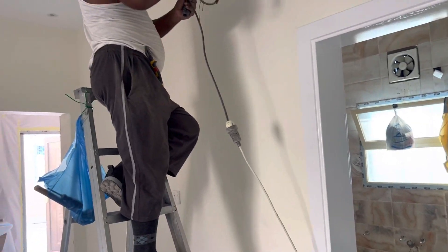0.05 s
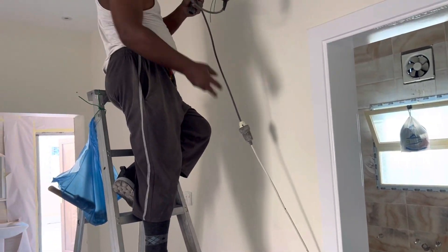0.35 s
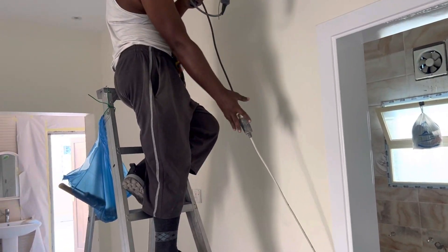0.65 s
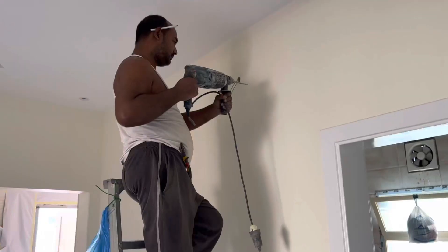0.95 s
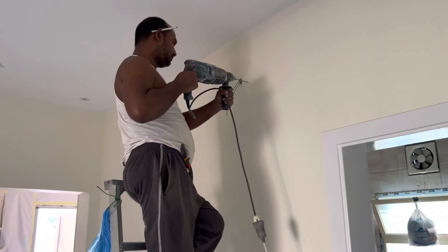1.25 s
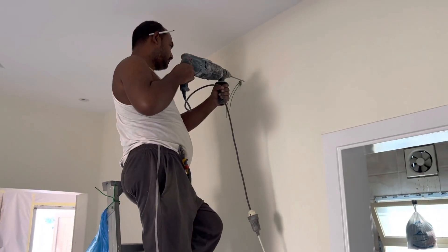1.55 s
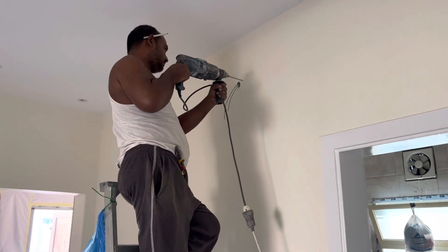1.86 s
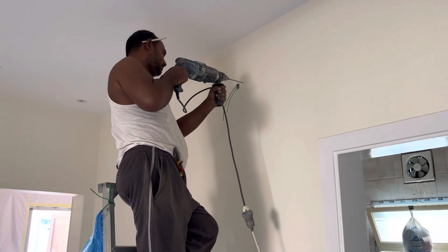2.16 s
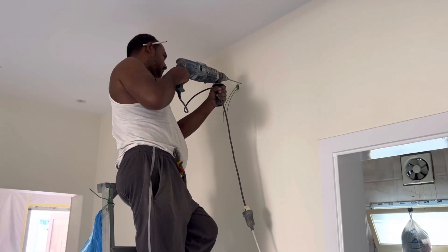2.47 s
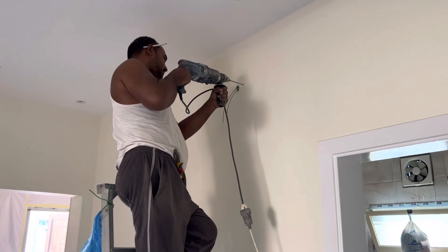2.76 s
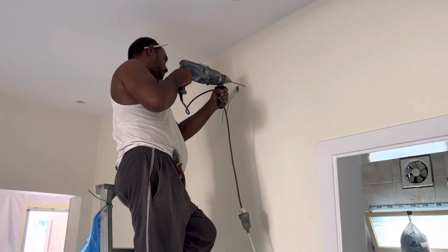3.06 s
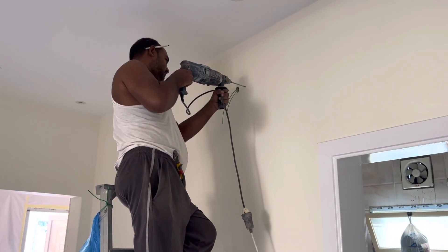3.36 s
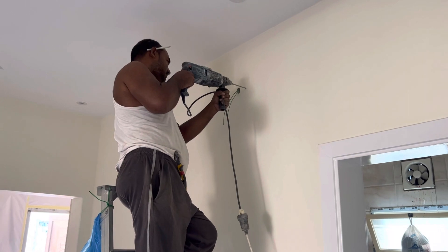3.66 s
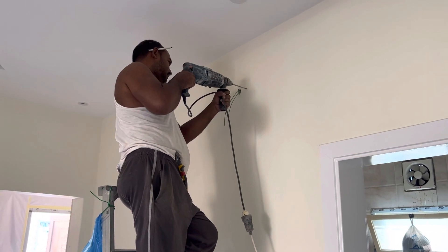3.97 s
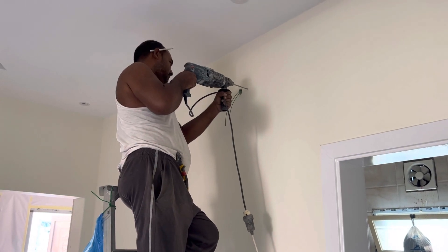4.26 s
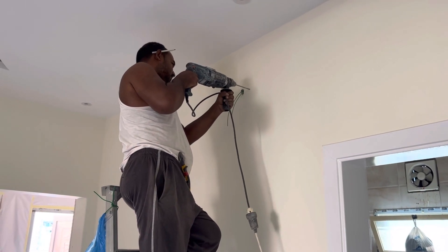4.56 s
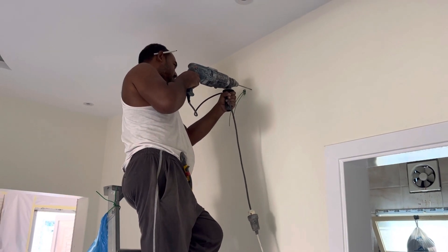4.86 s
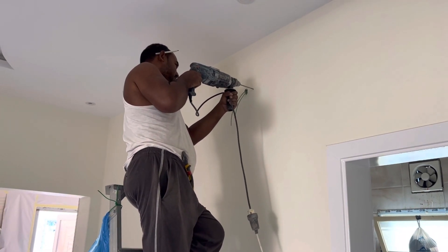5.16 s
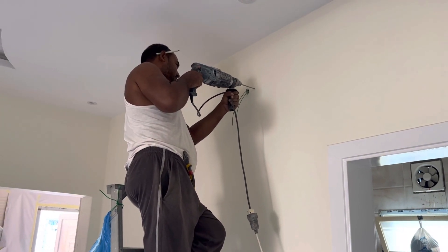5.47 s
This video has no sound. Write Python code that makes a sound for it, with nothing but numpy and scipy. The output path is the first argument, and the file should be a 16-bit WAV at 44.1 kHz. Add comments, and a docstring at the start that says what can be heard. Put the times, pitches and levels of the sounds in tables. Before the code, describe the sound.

A low electric hum and faint building rumble fill a bare, echoing room. A sharp plastic click comes at about 0.6 seconds, followed by soft hand scuffs. Near 1 second a corded hammer drill starts, close and in stereo, whining and grinding into masonry. A rapid flurry of blows ends in a brief, very high squeal at about 1.3 seconds. The drill swells again around 2 seconds, then winds down, its motor pitch falling under a thin whistle, and dies away by about 3.4 seconds with a light click. The hum remains, with trigger clicks between 4.2 and 4.7 seconds. The gears chatter drily, and from about 4.8 seconds the hammer starts slowly, then gets faster and louder. Each blow rings the steel bit and knocks the casing, while the chuck rattles, the bit scrapes and the wall booms until the end, at about 5.6 seconds.

```python
"""A corded rotary hammer drill bores into the wall of a bare, echoing room, on a close stereo pair.
First run: the bit grinds masonry in two swells, with a flurry of blows and a squeal, then whistles
as the motor winds down. Second run: after trigger clicks the hammer starts slowly and speeds up,
each blow ringing the steel bit, knocking the gear case and shaking the wall.
Electric hum and the rumble of the building fill the pauses."""
import sys
import numpy as np
from scipy import signal
from scipy.fft import rfft, irfft, next_fast_len
from scipy.io import wavfile
from scipy.ndimage import map_coordinates

SR = 44100
rng = np.random.default_rng(int(sys.argv[2]) if len(sys.argv) > 2 else 0)


def generate_wav(signal):
    """Clip the signal to [-1, 1] and save it as 16-bit WAV at the path in sys.argv[1]."""
    frames = np.transpose(np.atleast_2d(signal))
    scaled = np.clip(frames, -1, 1) * 32767
    pcm = np.round(scaled).astype(np.int16)
    wavfile.write(sys.argv[1], SR, pcm)


N = 243431

# Levels in the tables are relative; each source sets its own gain.
# rotor speed in the first run: t/s, f/Hz
ROTOR_SPEED = [(.96, 200.5), (1.15, 311), (1.28, 344.4), (1.45, 329.2), (1.7, 294.2), (1.85, 339.5),
               (1.95, 371.2), (2.05, 382.7), (2.18, 381.7), (2.5, 316.3), (3.3, 130.2)]
# trigger squeezes: pulled t/s, full power t/s, hold/s, level/dB, rise/(dB/s), fall/(dB/s)
TRIGGER_SQUEEZES = [(0.924, 0.974, .002, -30, 207, 23.5), (1.038, 1.176, 0.077, -23, 77, 13),
                    (1.763, 1.992, 0.098, -22.5, 25, 23)]
# pace of the striker in the first run: t/s, blow rate/Hz
STRIKER_PACE = [(1.073, 33.7), (1.12, 51.4), (1.2, 56.7), (1.235, 58)]
# single blows and jolts of the chuck: t/s, steel level/dB, knock level/dB, bite level/dB, chip t60/s
SINGLE_BLOWS = [(1.262, -5.5, -25, -15, .014), (1.279, -10, -30, -25, 0.018),
                (3.3112, -68, -49, -33.5, 0.015), (4.760, -56, -35, -26.5, .02),
                (4.835, -43, -26, -32, .02), (4.945, -32, -27, -34, 0.016), (5.0003, -32, -20, -36, .014),
                (5.047, -19.5, -22.5, -25, 0.017), (5.091, -17.5, -20.5, -33, .022),
                (5.1325, -20, -27, -20, 0.02), (5.1723, -18, -21.5, -22, .028),
                (5.2105, -14, -19, -20, .028), (5.2482, -12, -19, -15, .014), (5.283, -16.5, -25, -21, .04),
                (5.317, -17, -15.5, -16, 0.025), (5.356, -11.5, -18.5, -24, 0.02),
                (5.3938, -11.5, -20, -29, 0.013), (5.428, -26, -15.5, -30, .022),
                (5.4702, -11, -13.5, -34, 0.024), (5.5102, -16, -16, -18, .022)]
# kicks of the bit against the chuck: t/s, level/dB
BIT_REBOUNDS = [(4.868, -29.5), (4.966, -26), (5.035, -24), (5.080, -26), (5.326, -23), (5.493, -17)]
# struck modes: f/Hz, level/dB, t60/s
BIT_MODES = [(8300, -16.5, 0.052), (9700, 0.5, 0.05), (11100, -12.5, .025), (13330, 6, 0.05),
             (14700, -5, 0.039), (14770, -9, .05), (15290, -7, 0.025)]
CASE_MODES = [(167, -16, 0.042), (293, -11.5, 0.032), (1020, -8.5, 0.025), (1300, 5.5, 0.019),
              (1433, 3, 0.023), (1972, -2, 0.02), (2180, -8.5, .016), (2590, -6.5, 0.02)]  # chuck and gear case
# resonances of the housing: f/Hz, width/Hz, level/dB
HOUSING_MODES = [(1020, 39, -10.5), (1792, 90, -8.5), (4740, 41, -6.5)]
# resonances flaring up in the first run: t/s, half length/s, f/Hz, level/dB
RESONANCE_FLARES = [(1.215, 0.046, 1780, -33), (1.84, .05, 985, -43.5), (1.89, 0.088, 1397, -35),
                    (2.02, 0.045, 1266, -36), (2.112, .04, 1423, -36), (2.23, .06, 1016, -40),
                    (2.35, .4, 3032, -47), (2.68, 0.16, 871, -49.5), (2.953, .2, 1057, -59)]
# brief swells: t/s, half length/s, level/dB
SECOND_ORDER_SWELLS = [(1.352, 0.039, -33.5), (1.88, 0.044, -41.5), (2.0, 0.06, -34.5)]  # the rotor's second order sings out
HAND_SCUFFS = [(.782, .04, -48), (0.919, .016, -52)]
# growl of the crank: multiples of its speed, and level/dB for each
CRANK_HARMONICS = [2, 3, 4, 9, 12]
CRANK_LEVELS = [-38.5, -32, -29.5, -29, -22.5]
# clicks of plug, trigger and chuck: t/s, level/dB, treble re level/dB, echo/dB
PLASTIC_CLICKS = [(.549, -51.5, -32, 40), (.597, -23.5, -10.5, 34), (3.219, -49, -2, 36),
                  (3.311, -44.5, -30, 28), (4.182, -58, -10, 33.5), (4.472, -66, -29, 39),
                  (4.553, -36, -0.5, 41), (4.672, -43, -1, 41.5)]
# room tone: from t/s, hum f/Hz, hum level/dB, buzz level/dB, rumble level/dB, air level/dB
ROOM_TONE = [(0, 59.9, -49, -49.5, -43, -44), (.95, 64, -64, -60, -55, -47),
             (2.97, 64.3, -51.5, -59.5, -55, -49), (4.6, 60, -45.5, -51, -49, -47)]
# noise spectra: f/Hz, level/dB
GRIND_SPECTRUM = [(60, -40), (150, -16.5), (200, -19), (330, -3), (480, -4), (750, 0.5), (1050, 0.5),
                  (1400, 3.5), (2500, 1), (3300, -0.5), (4000, 0), (5500, -1.5), (7000, -5), (9000, -8),
                  (12000, -10.5), (15500, -19.5)]  # crushed masonry and cooling air
BITE_SPECTRUM = [(80, -23), (140, -10.5), (260, -3), (550, -1), (1000, -9), (1550, -2.5), (1790, 9),
                 (2050, 4.5), (2800, -2), (3500, 2.5), (4300, 0.5), (6000, -6), (9000, -14.5), (14000, -23)]  # the wall cracking under a blow
RATTLE_SPECTRUM = [(200, -21.5), (600, -16), (820, -7), (1000, 1), (1290, 2), (1440, -5), (1620, -20),
                   (1950, -7), (2550, -6), (2850, -17), (3050, -8), (3450, -16), (7000, -37)]  # the chuck
BOOM_SPECTRUM = [(35, -25), (60, -13.5), (85, 1), (112, -0.5), (170, 6.5), (300, 2), (380, -0.5), (500, 1),
                 (700, -12.5), (1200, -32)]  # the shaken wall
SCRAPE_SPECTRUM = [(500, -9.5), (2000, 13.5), (3500, 4), (5000, 5), (6800, 1), (8400, 3), (11500, -3),
                   (13500, -10), (15500, -7.5)]  # the bit in its hole
CHATTER_SPECTRUM = [(400, -12), (900, -1.5), (1380, -2), (1600, -5), (2200, -3), (2520, 1), (2850, -7),
                    (6000, -18)]  # slowly turning gears
SNAP_SPECTRUM = [(150, -16), (600, -8.5), (1200, 2), (1700, -4.5), (2600, -0.5), (4000, -1), (6300, -0.5),
                 (9000, -2.5), (15000, -24)]  # hard plastic
SCUFF_SPECTRUM = [(300, -9), (1100, 5.5), (2400, 1), (4000, -6), (9000, -23)]  # hands on the housing
RUMBLE_SPECTRUM = [(20, -45), (33, -21), (48, 3.5), (80, 3), (115, -0.5), (170, -3), (300, -9), (600, -15),
                   (1300, -19.5), (2500, -31), (5000, -47), (9000, -68), (15000, -74)]  # the building
# decay of the bare room: f/Hz, t60/s
ROOM_DECAY = [(150, 0.31), (1000, 1), (3000, 1), (7000, 0.69), (12000, 0.44), (16000, 0.74)]
# likeness of the sound at the two microphones: f/Hz, correlation
MIC_LIKENESS = [(60, 0.98), (130, 0.94), (260, 0.87), (500, .52), (1000, 0.23), (3000, 0.16), (6500, 0.095),
                (8500, 0.93), (11000, 1)]
# balance of the pair: f/Hz, left minus right level/dB
MIC_BALANCE = [(120, -0.5), (250, 0.3), (500, 1.5), (1000, 2.5), (2000, -0.5), (4000, 0.9), (8000, 1)]

CENTRE = np.array([[1], [0]])  # sources are (centre, sideways) pairs; this one sits dead centre
TOP_SPEED_HZ, FREE_S = 386, 2.08  # nominal top speed; the motor runs free from this time
CREEP_S, ENGAGE_S, PRESS_S = 4.556, 4.833, 4.876  # second run: gears start, bit meets wall, is pressed home


def grinding():
    """The flutes crush masonry into dense grit, in a rush of cooling air that pulses with the rotor."""
    turns = np.cumsum(rotor_hz()) / SR
    air = noise() * (1 + .2 * np.sin(2 * np.pi * turns))
    grit = 0.49 * grains(rate=2500, spread_db=0.5)
    rush = housing(coloured(air + grit, GRIND_SPECTRUM), ring_db=-2.5)
    rush = near_walls(rush, reflect_db=-8, spread_s=.02)
    body = lowpass(rush, 620, order=4)
    dust = highpass(rush, 6500, order=6)
    body_gain = amp(-2.5 - 6 * since(FREE_S))  # thins out once the motor runs free
    dust_gain = amp(2 - 37 * since(3.004))
    mix = rush - body - dust + body_gain * body + dust_gain * dust
    return running() * amp(effort_db() + 2.5 + 0.85 * wobble(40.14)) * mix


def hammer(bite_t60=0.018):
    """Each blow rings the steel bit, chips the masonry, knocks the case and bites into the wall."""
    out, t = np.zeros((2, N)), np.arange(SR // 10) / SR
    burst = lambda t60: amp(-60 * t / t60) * rng.standard_normal(len(t))
    for s, steel_db, knock_db, bite_db, chip_t60 in flurry() + SINGLE_BLOWS:
        chips = highpass(burst(chip_t60), 9000, order=8)
        attack = 1 - np.exp(-t / 0.00035)
        steel = amp(steel_db - 6.5) * (0.583 * ring(BIT_MODES, t, detune=0.0036) + 2.4 * chips) * attack
        knock = amp(knock_db) * case_knock(t)
        bite = amp(bite_db) * shaped(burst(bite_t60), BITE_SPECTRUM)
        blow = in_room(steel, wet_db=-1.5) + in_room(knock, wet_db=-0.5) + in_room(bite, wet_db=-0.5)
        add(out, s, blow)
    return out


def flurry(steel_db=-18.5, knock_db=-30, bite_db=-10.5, chip_t60=.025):
    """The striker speeds up and bites ever harder in the first run; rows as in SINGLE_BLOWS."""
    t = np.arange(STRIKER_PACE[0][0], STRIKER_PACE[-1][0], 1 / SR)
    strokes = np.cumsum(np.interp(t, *np.transpose(STRIKER_PACE))) / SR
    times = np.interp(np.arange(int(strokes[-1]) + 1), strokes, t)
    weak_db = 7.5 * np.exp(-(times - times[0]) / 0.042)
    scatter_db = 0.7 * rng.standard_normal(len(times))
    return [(s, steel_db + db, knock_db + db, bite_db - weak + db, chip_t60)
            for s, weak, db in zip(times, weak_db, scatter_db)]


def case_knock(t):
    """One hard knock: a crack and the ringing modes of chuck and gear case."""
    crack = shaped(amp(-8 - 60 * t / .016) * rng.standard_normal(len(t)), SNAP_SPECTRUM)
    return (ring(CASE_MODES, t, detune=0.02) + crack) * (1 - np.exp(-t / 0.0009))


def rebounds():
    """Between blows the bit kicks back against the chuck."""
    out, t = np.zeros((2, N)), np.arange(SR // 10) / SR
    for s, db in BIT_REBOUNDS:
        add(out, s, in_room(amp(db) * case_knock(t), wet_db=-3.5))
    return out


def shaking(wall_mode_hz=108.5):
    """The chuck rattles, the wall booms and the bit scrapes, all growing as the drill is leant on."""
    slack = 1 - ramp(PRESS_S, 0.39)  # 0 at full pressure
    rattle = coloured(noise() + 0.9 * grains(rate=900, spread_db=0), RATTLE_SPECTRUM)
    rattle = near_walls(rattle, reflect_db=-11, spread_s=0.03)
    wall_mode = amp(-6 + 0.74 * wobble(11)) * sine(wall_mode_hz) * CENTRE
    boom = coloured(noise() + 0.5 * grains(rate=290, spread_db=2.3), BOOM_SPECTRUM) + wall_mode
    scrape = coloured(noise() + .5 * grains(rate=5400, spread_db=-4.5), SCRAPE_SPECTRUM)
    return ramp(ENGAGE_S, 0.006) * (amp(-23 - 18 * slack) * rattle
                                    + amp(-30 - 22 * slack) * boom
                                    + amp(-28.5 - 13 * slack ** 2) * scrape)


def motor():
    """Rotor and gears whine at multiples of the rotor speed, louder with effort."""
    speed_hz, effort = rotor_hz(), amp(effort_db())
    first = effort * amp(-20) * (speed_hz / TOP_SPEED_HZ) ** 7.5 * tone(speed_hz, width_hz=23)
    singing = sum(amp(db) * swell(s, half) for s, half, db in SECOND_ORDER_SWELLS)
    direct = np.sqrt(2) * np.sin(4 * np.pi * np.cumsum(speed_hz) / SR) * CENTRE
    second = (effort * amp(-28) + singing) * (direct + 0.31 * tone(2 * speed_hz, width_hz=17))
    meshing = sum(amp(4 * np.tanh(wobble(12))) * tone(order * speed_hz, width_hz=11)
                  for order in range(3, 18))
    gears = effort * amp(-19.5 - 7.5 * since(FREE_S)) * meshing  # unloaded, they sink into the rush
    return running() * (first + second + gears)


def crank(gear_ratio=5.17):
    """The hammer's crank, geared down from the rotor, growls while the drill is at speed."""
    crank_hz = rotor_hz() / gear_ratio
    growl = sum(amp(db) * tone(order * crank_hz, width_hz=9)
                for order, db in zip(CRANK_HARMONICS, CRANK_LEVELS))
    return running() * amp(effort_db()) * (crank_hz / crank_hz.max()) ** 4 * growl


def bit(bind_s=1.26, rise_s=.045, squeal_hz=14500):
    """The bit briefly binds and squeals; turning free, it whistles higher as it slows."""
    whistle_hz = 7700 + 3.9 * (TOP_SPEED_HZ - rotor_hz())
    rasp = unit(tone(whistle_hz + 90 * wobble(150), width_hz=450) + .7 * tone(whistle_hz, width_hz=1300))
    whistle = amp(-41 - 15.5 * since(2.53) - 58 * since(2.84)) * ramp(1.4, .1) * rasp
    run_down = amp(-53.5) * ramp(1.9, 0.41) * (1 - ramp(3.03, 0.19)) * tone(5300, width_hz=320)
    binding = np.sqrt(ramp(bind_s, rise_s)) * amp(-21 - 152 * since(bind_s + rise_s))
    squeal = binding * (0.8 * sine(squeal_hz) + 0.2 * tone(squeal_hz, width_hz=120))
    return running() * (whistle + run_down + squeal)


def rotor_hz():
    """The rotor's turns per second at each sample."""
    return np.interp(np.arange(N) / SR, *np.transpose(ROTOR_SPEED))


def running():
    """1 while the motor turns in the first run."""
    return ramp(.949, .018) * (1 - ramp(3.45, .35))


def effort_db(pull_s=.04, stall_s=3.137):
    """The bit works harder with each squeeze, eases as the rotor coasts, and is stopped by friction."""
    power = 1e-12
    for pulled, full, held, db, rise, fall in TRIGGER_SQUEEZES:
        coasting = since(full + held)
        let_go_db = 1 - np.exp(-coasting / 0.073)  # a quick 1 dB drop on release
        swell_db = db - rise * until(full) - let_go_db - fall * coasting
        power = power + ramp(pulled, pull_s) * amp(swell_db) ** 2
    return 10 * np.log10(power) - 35 * since(stall_s)


def housing(x, ring_db, grip_db=4.5):
    """The housing's resonances colour x, each coming and going as the grip shifts."""
    ringing = 0
    for centre, width, db in HOUSING_MODES:
        band = filtered(x, lambda hz: 1 / (1 + ((hz - centre) / (width / 2)) ** 2))
        ringing = ringing + amp(ring_db + db / 2 + grip_db * np.tanh(wobble(7))) * band
    return unit(x + ringing)


def flares():
    """As speed and grip change, one resonance of the drill after another rings roughly."""
    return sum(amp(db) * swell(s, half) * tone(hz, width_hz=50) for s, half, hz, db in RESONANCE_FLARES)


def creeping_gears():
    """The gears take up with a metallic ring, then chatter drily until the bit is pressed home."""
    chatter = amp(-47.5) * coloured(noise() + 0.69 * grains(rate=500, spread_db=2), CHATTER_SPECTRUM)
    take_up = amp(-49 - 85 * since(CREEP_S)) * tone(2530, width_hz=150)
    return ramp(CREEP_S, 0.012) * (1 - ramp(PRESS_S, 0.087)) * (chatter + take_up)


def clicks():
    """Plug, trigger and chuck snap: a brief bright crack, then a long dull echo off the walls."""
    out = np.zeros((2, N))
    for s, db, treble_db, echo_db in PLASTIC_CLICKS:
        tail = amp(echo_db) * echo_tail()
        t = np.arange(tail.shape[1]) / SR
        crack = amp(-60 * t / 0.12) * rng.standard_normal(tail.shape)
        snap = shaped(amp(-1) * crack + tail, SNAP_SPECTRUM)
        tick = highpass(amp(4) * crack + amp(-15.5) * tail, 10000, order=8)
        add(out, s, amp(db - 6) * snap + amp(db + treble_db) * tick)
    return out


def scuffs():
    """Hands shift on the plastic housing before the first run."""
    swells = sum(amp(db) * swell(s, half) for s, half, db in HAND_SCUFFS)
    return swells * coloured(noise() + 0.55 * grains(rate=400, spread_db=1), SCUFF_SPECTRUM)


def near_walls(x, reflect_db, spread_s, count=24):
    """Early reflections from the nearby corner of wall and ceiling ripple the spectrum."""
    delays, sizes = rng.random((2, 2, count))
    paths = np.zeros((2, SR // 4))
    for path, delay, size in zip(paths, delays, sizes):
        arrivals = (delay * spread_s * SR).astype(int) + 1
        path[arrivals] = amp(reflect_db) * unit(size - .5) / np.sqrt(count)
    paths[:, 0] = 1
    return unit(signal.fftconvolve(x, paths, axes=1)[:, :N])


def in_room(x, wet_db):
    """A short sound reaches the microphones head-on, followed by the room's echo."""
    paths = amp(wet_db) * echo_tail()
    paths[0, 0] += 1
    return signal.fftconvolve(x[None], paths, axes=1)


def echo_tail():
    """One second of diffuse echo from the bare walls; the midrange hangs on longest."""
    hz, t, spectra = signal.stft(rng.standard_normal((2, SR)), SR, nperseg=256)
    decay = amp(-60 * t / along(ROOM_DECAY, hz)[:, None])
    tail = signal.istft(spectra * decay, SR, nperseg=256)[1]
    return tail / np.linalg.norm(tail[0])


def room_tone():
    """Electric hum over the rumble of the building, with a faint whine and a fading hiss at first."""
    hum_hz, hum_db, buzz_db, rumble_db, air_db = stretches(ROOM_TONE)
    phase = 2 * np.pi * np.cumsum(hum_hz + .5 * wobble(10)) / SR
    hum = amp(hum_db + 1.2 * wobble(21)) * np.sqrt(2) * np.sin(phase) * CENTRE
    buzz = amp(buzz_db) * tone(116, width_hz=6.1)
    air = coloured(noise(), RUMBLE_SPECTRUM)
    rumble = lowpass(air, 550, order=2)
    whine = (1 - ramp(.6, .3)) * (amp(-76.5) * tone(6260, width_hz=550) + amp(-82) * noise())
    hiss = coloured(noise(), [(1500, -11), (3800, 8.5), (6500, -4.5), (9000, -21)])
    hiss *= amp(-64 - 30 * since(0))
    return hum + buzz + amp(rumble_db) * rumble + amp(air_db) * (air - rumble) + whine + hiss


def noise():
    """White noise as a (centre, sideways) pair."""
    return rng.standard_normal((2, N))


def grains(rate, spread_db):
    """Random tiny impacts of uneven size, rate a second."""
    impacts = (rng.random((2, N)) < rate / SR) * noise()
    return unit(impacts * amp(spread_db * np.minimum(rng.exponential(size=(2, N)), 4)))


def sine(hz):
    """A steady tone at rms 1."""
    return np.sqrt(2) * np.sin(2 * np.pi * hz * np.arange(N) / SR)


def tone(hz, width_hz):
    """A line whose strength and phase wander, as among the room's standing waves."""
    phase = 2 * np.pi * np.cumsum(hz * np.ones(N)) / SR
    pair = [wobble(width_hz) * np.cos(phase) + wobble(width_hz) * np.sin(phase) for _ in range(2)]
    return unit(np.array(pair))


def ring(modes, t, detune):
    """Damped modes, struck a little differently each time."""
    return sum(amp(db + rng.normal(0, 1.5) - 60 * t / t60)
               * np.sin(2 * np.pi * hz * (1 + rng.normal(0, detune)) * t) for hz, db, t60 in modes)


def wobble(rate):
    """A smooth random curve, rate knots a second."""
    return map_coordinates(rng.standard_normal(int(N * rate / SR) + 4), [np.arange(N) * rate / SR])


def ramp(start, length):
    """A rise from 0 to 1."""
    return np.clip((np.arange(N) / SR - start) / length, 0, 1)


def swell(s, half):
    """A smooth hump around time s."""
    return np.exp(-((np.arange(N) / SR - s) / half) ** 2)


def since(start):
    """Seconds gone by since start; 0 before it."""
    return np.maximum(np.arange(N) / SR - start, 0)


def until(end):
    """Seconds left until end; 0 after it."""
    return np.maximum(end - np.arange(N) / SR, 0)


def stretches(rows, glide_s=0.024):
    """Each column holds its value until the next row's time, then glides to the new one."""
    rows = np.array(rows)
    steps = sum((new - old)[1:, None] * ramp(new[0], glide_s) for old, new in zip(rows, rows[1:]))
    return rows[0, 1:, None] + steps


def amp(db):
    """Decibels to gain."""
    return 10 ** (np.asarray(db) / 20)


def unit(x):
    """Scale to rms 1."""
    return x / np.sqrt(np.mean(x ** 2) + 1e-20)


def along(points, hz):
    """Interpolate (f/Hz, value) points on a log axis."""
    f, v = np.transpose(points)
    return np.interp(np.log(hz + 1), np.log(f + 1), v)


def filtered(x, response):
    """x through a frequency response."""
    m = next_fast_len(x.shape[-1] + SR // 4)
    return irfft(rfft(x, m) * response(np.fft.rfftfreq(m, 1 / SR)), m)[..., :x.shape[-1]]


def lowpass(x, corner_hz, order):
    """The part of x below the corner."""
    return filtered(x, lambda hz: 1 / (1 + (hz / corner_hz) ** order))


def highpass(x, corner_hz, order):
    """The part of x above the corner."""
    return x - lowpass(x, corner_hz, order)


def shaped(x, spectrum):
    """x through a curve of (f/Hz, level/dB) points."""
    return filtered(x, lambda hz: amp(along(spectrum, hz)))


def coloured(x, spectrum):
    """x shaped by the spectrum, at rms 1."""
    return unit(shaped(x, spectrum))


def add(track, s, sound):
    """Mix a sound in at time s."""
    part = track[:, round(s * SR):][:, :sound.shape[1]]
    part += sound[:, :part.shape[1]]


def scene():
    """Drill and room reach two closely spaced microphones; in the top octave the left trails the right."""
    field = (grinding() + motor() + crank() + flares() + scuffs() + bit() + creeping_gears()
             + hammer() + rebounds() + shaking() + clicks() + room_tone())
    spread = lambda hz: np.arccos(np.clip(along(MIC_LIKENESS, hz), -1, 1)) / 2
    mid, side = filtered(field, lambda hz: np.array([np.cos(spread(hz)), np.sin(spread(hz))]))
    left_right = np.array([mid + side, mid - side])
    lag = lambda hz: np.pi * np.maximum(hz - 8450, 0) / 3500
    return filtered(left_right, lambda hz: np.exp(1j * np.array([-lag(hz), lag(hz)])))


def record(dry):
    """The left microphone hears a little more; the recorder cuts off steeply at its band limit."""
    leaning = filtered(dry, lambda hz: amp(np.array([along(MIC_BALANCE, hz), -along(MIC_BALANCE, hz)]) / 2))
    return lowpass(leaning, 15900, order=120)


dry = scene()
out = record(dry)
generate_wav(out)
```